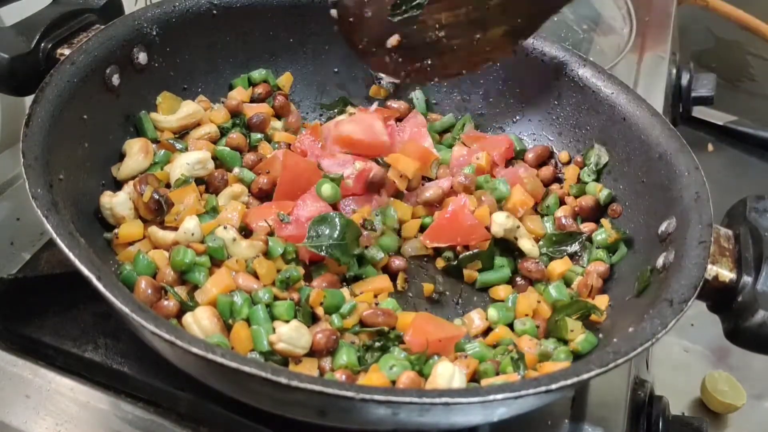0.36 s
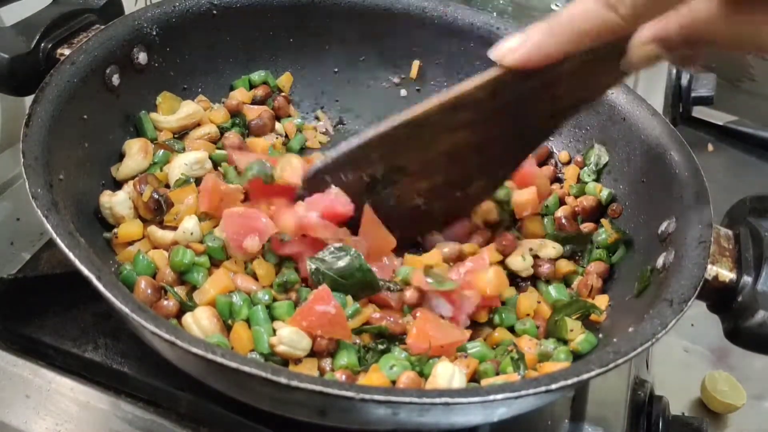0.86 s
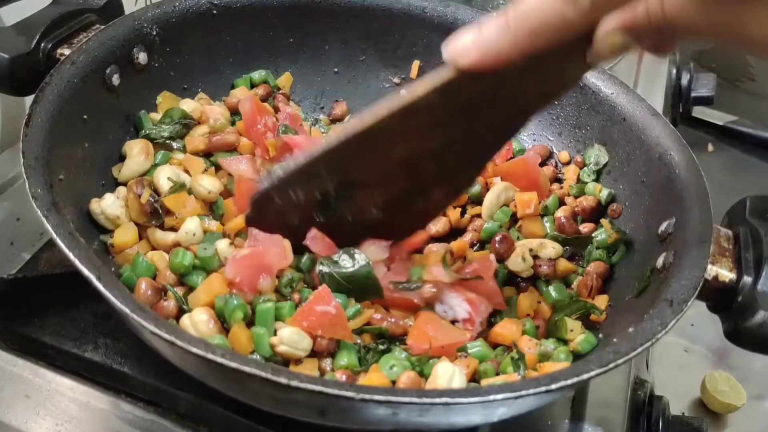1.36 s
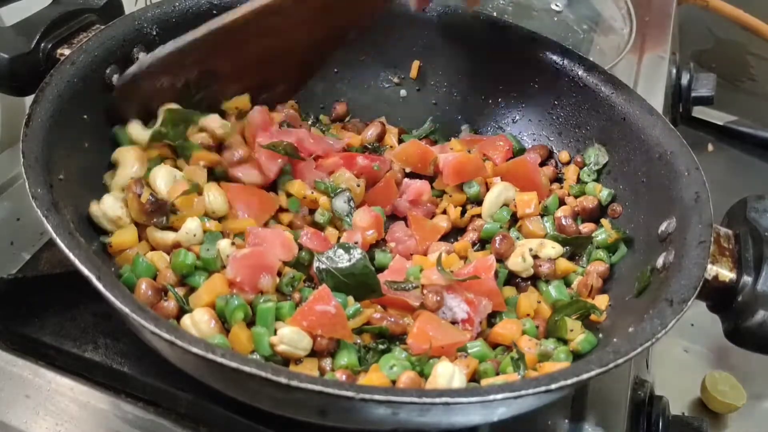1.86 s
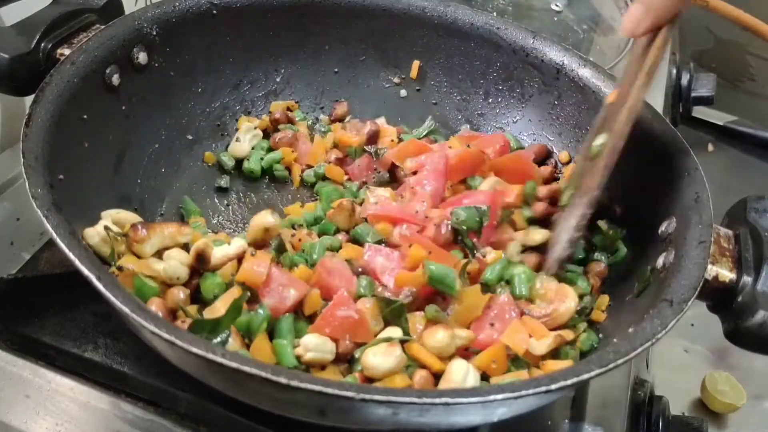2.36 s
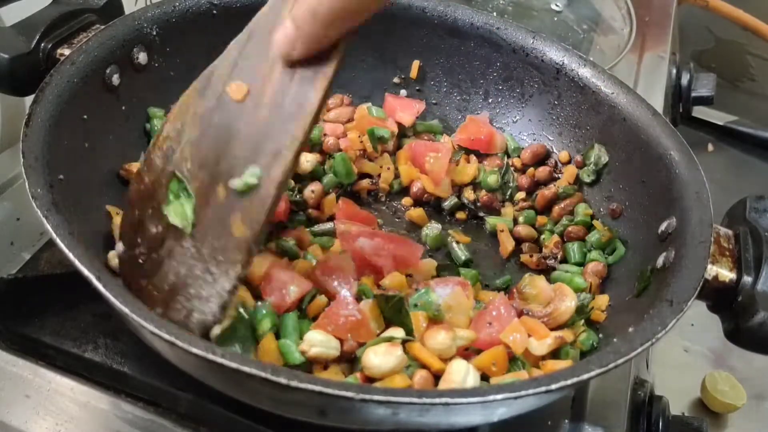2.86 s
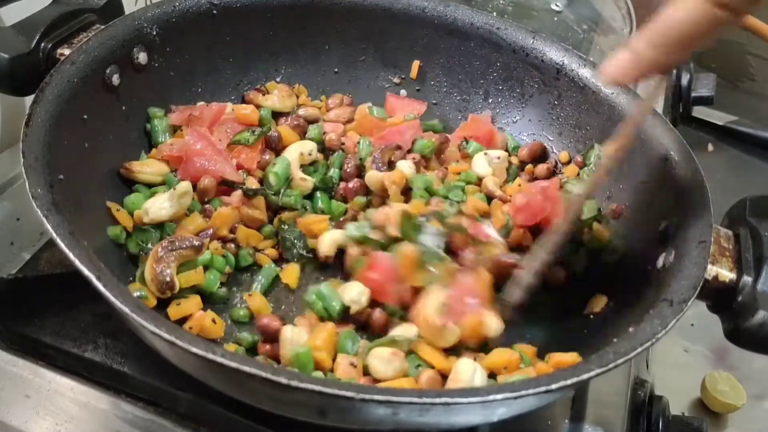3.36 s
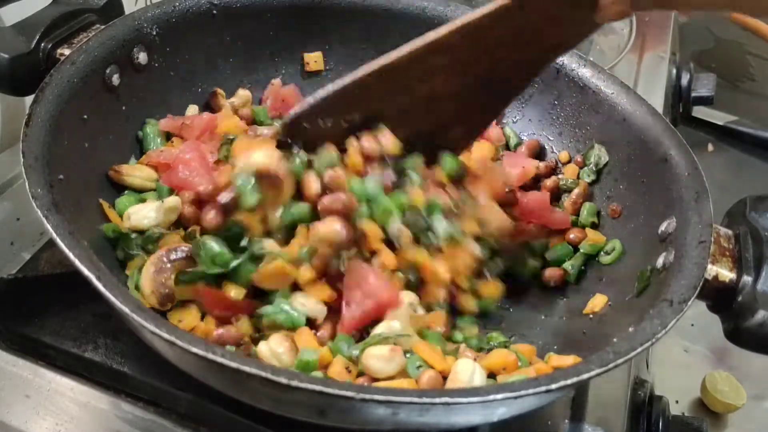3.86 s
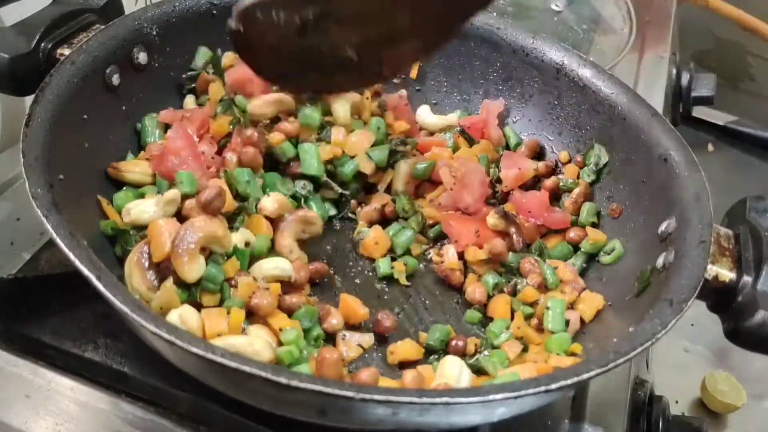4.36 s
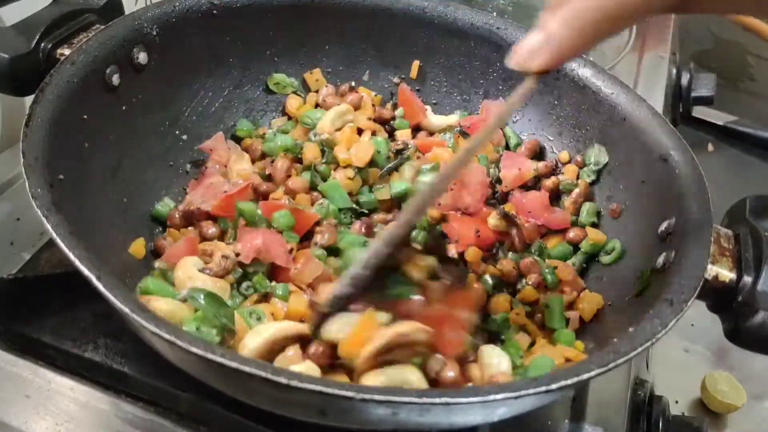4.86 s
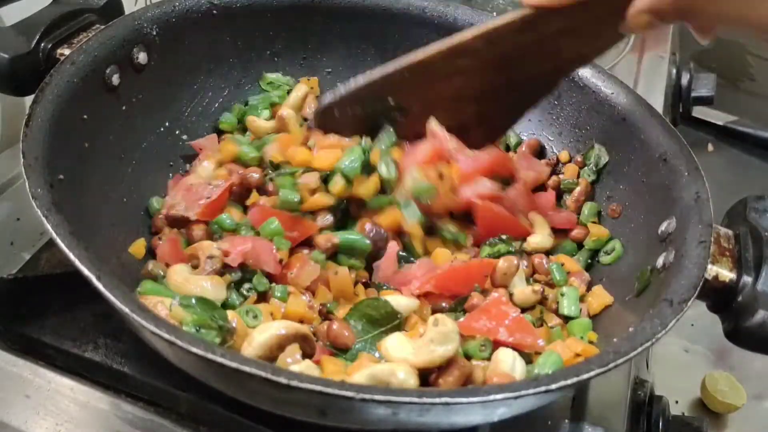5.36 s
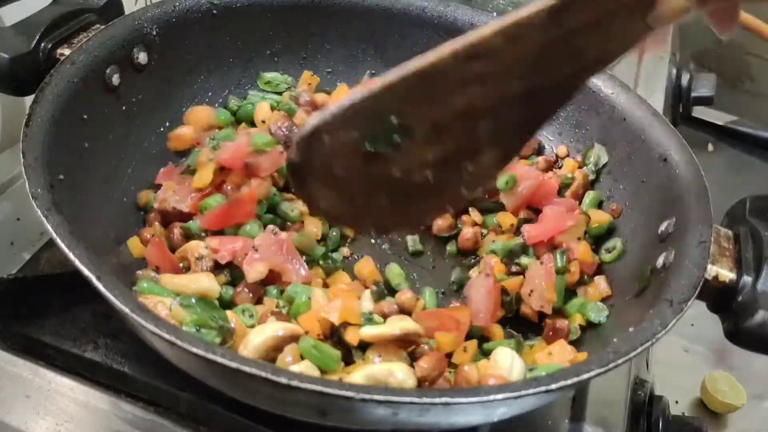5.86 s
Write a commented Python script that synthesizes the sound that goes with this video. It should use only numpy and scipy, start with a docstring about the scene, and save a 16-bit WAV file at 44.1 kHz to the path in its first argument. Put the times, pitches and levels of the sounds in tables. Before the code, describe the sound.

A wooden spatula knocks and scrapes through chopped vegetables and nuts in a coated pan, over a light sizzle with spitting drops and low flame rumble.

```python
"""A small tiled kitchen, with two microphone ports of unlike colour close to a coated pan on a gas flame.
The flame rumbles and a deep throb swells; oil and juice sizzle, flare and spit as shaped noise.
A wooden spatula scrapes chopped vegetables and nuts: dense small blows ring the modes of the pan.
Its knocks start all modes at once and are choked; sparse taps give the answer of the kitchen."""
import sys
import numpy as np
from scipy import signal
from scipy.fft import rfft, irfft
from scipy.io import wavfile
from scipy.ndimage import uniform_filter1d

SR = 44100
rng = np.random.default_rng(int(sys.argv[2]) if len(sys.argv) > 2 else 0)


def gain_from_db(level_db):
    """Turn a decibel level (scalar or array-like) into a linear amplitude factor."""
    decades = np.asarray(level_db, float) / 20
    return 10 ** decades


def generate_wav(sig):
    """Save sig (samples, or channels by samples) to the path in sys.argv[1] as 16-bit PCM at SR."""
    pcm = np.round(np.clip(np.atleast_2d(sig).T, -1, 1) * 32767).astype(np.int16)
    wavfile.write(sys.argv[1], SR, pcm)


N = 264114
TIME = np.arange(N) / SR  # s
HZ = np.fft.rfftfreq(N, 1 / SR)

# burner and quiet of the room: (frequency [Hz], relative level [dB])
FLAME = [(35, -46), (60, 12), (119, 8), (193, 9), (299, 20.5), (542, 6), (879, 1), (1090, 7.5), (2500, 1),
         (3250, -63)]
# swells of a deep throb of pan and stove: (middle [s], half length [s], level [dB])
THROBS = [(0.335, 0.17, -59.5), (1.345, 0.29, -54.5), (2.287, 0.23, -58), (2.79, 0.28, -66.5),
          (3.826, 0.1, -52), (4.468, 0.096, -51.5), (5.907, 0.052, -50)]
# heat of the frying: (time [s], fizz level [dB])
SIZZLE = [(0.0, -53), (0.4, -54.5), (0.92, -55.5), (1.06, -48.5), (1.17, -54.5), (1.5, -51.5), (1.75, -48),
          (1.95, -59), (2.25, -57), (2.37, -52), (2.85, -49), (4.45, -51.5), (4.86, -64), (5.05, -55.5),
          (5.42, -57), (5.65, -51.5), (5.79, -59), (5.99, -52)]
# colour of the fine bubbles: (frequency [Hz], relative level [dB])
FIZZ = [(3500, -23), (5500, 2), (6500, 4), (8000, 2.5), (10000, 7), (11800, -4), (14500, 2), (16000, 4.5)]
# colour of the coarser bubbles: (frequency [Hz], relative level [dB])
BUBBLING = [(900, -15), (1900, -13), (2500, -4), (3500, -2.5), (5000, -4.5), (7000, -14.5)]
# fresh juice reaching the oil: (start [s], held [s], level [dB], centre [Hz], width [octaves])
FLARES = [(0.336, 0.088, -48, 3860, 1.6), (0.71, 0.046, -47.5, 4080, 1.5), (0.999, 0.16, -56, 3570, 0.49),
          (2.07, .26, -60.5, 5140, 0.078), (4.93, 0.11, -58.5, 5150, 0.11), (5.55, 0.11, -58, 3500, 0.54)]
# drops of juice bursting in the oil: (time [s], level at the crack [dB], centre [Hz])
SPITS = [(1.295, -41, 15100), (1.413, -38.5, 8000), (2.199, -40, 14700), (2.353, -34.5, 10900),
         (2.771, -34, 10000), (2.9533, -38, 13600), (2.9674, -35, 9650), (3.305, -35.5, 8700),
         (3.33, -38, 9500), (3.334, -40, 7000), (3.418, -48, 9500), (3.468, -50, 9000), (3.496, -34, 5750),
         (3.772, -32.5, 9500), (4.0368, -34.5, 9750), (4.322, -38.5, 5770), (4.93, -36, 14800),
         (5.0387, -34.5, 9500), (5.1265, -33.5, 5760), (5.516, -41.5, 9000)]
# decay of the tiled room: (frequency [Hz], t60 [s])
KITCHEN = [(200, 0.57), (800, 0.21), (2500, 0.47), (8000, 0.049)]
# pan modes in four groups, low, middle, high, top, before damping:
# (frequency [Hz], relative level [dB], t60 [s])
PAN_MODES = [
    [(181, 4.5, 0.15), (239.4, 11.5, 0.24), (312.6, 18, 0.16), (365, 4.5, 0.21), (420, 18.5, 0.14),
     (511, 14.5, 0.1)],
    [(593, 5, 0.1), (661.5, 8, 0.16), (747, 9.5, 0.086), (800.5, 8.5, 0.18), (862.6, 10, 0.088),
     (980, 9.5, 0.064)],
    [(1180, 0, 0.12), (1260, -0.5, 0.32), (1399, 15.5, 0.028), (1465, 1.5, 0.19), (1547, 7, 0.088),
     (1946, 2, 0.11), (2290, 4, 0.082), (2570, -7, 0.22)],
    [(2502, 33.5, 0.011), (3240, 17.5, 0.041), (4154, 22, 0.039)],
]
# strokes of the spatula through the food; edge = how much the bare edge touches the pan:
# (start [s], held [s], pressure [dB], edge [dB], ring of the touched spot [Hz])
STROKES = [(0.046, 0.14, -59.5, 2, 313), (0.186, 0.034, -59.5, 5.5, 850), (0.257, 0.11, -38.5, -5.5, 634),
           (0.334, 0.019, -71, -3.5, 237), (0.716, 0.011, -47, 2.5, 812), (0.949, 0.048, -67.5, 5.5, 853),
           (1.047, 0.32, -56, -39, 311), (1.237, 0.057, -46.5, -3, 247), (1.31, 0.012, -50.5, 0, 870),
           (1.586, 0.04, -44, -1.5, 307.7), (1.661, 0.11, -47, 1.5, 930), (2.179, 0.072, -53.5, -3, 420),
           (2.267, 0.043, -38, -1.5, 957), (2.668, 0.039, -40, -0.5, 1260), (2.76, 0.14, -64, 0, 241),
           (3.138, 0.028, -39, -5.5, 1260), (3.489, 0.15, -52, 1, 718), (3.718, 0.027, -62, 0.5, 866),
           (3.822, 0.047, -46.5, 1.5, 1260), (3.938, 0.034, -46, -6.5, 362), (4.05, 0.05, -62.5, 6, 856),
           (4.236, 0.18, -67, 10.5, 880), (4.322, 0.13, -40.5, -2, 779), (4.817, 0.031, -44, 7.5, 1570),
           (5.045, 0.016, -50.5, 6, 1920), (5.075, 0.038, -39.5, -2.5, 653), (5.414, 0.01, -64, 1.5, 865),
           (5.58, 0.17, -67, 12, 869), (5.819, 0.18, -45, -3, 239), (5.944, 0.058, -52, 12, 1480)]
# spatula landing on the pan: (time [s], peak of middle ring [dB], centre of middle ring [Hz],
# centre of high ring [Hz], top ring re middle peak [dB])
KNOCKS = [(0.186, -46.5, 800, 1340, 1.5), (0.26, -23, 765, 1180, -19.5), (0.279, -27, 640, 1550, -61),
          (0.337, -37, 586, 1390, -3), (0.67, -51, 980, 1180, -2), (0.715, -33.5, 895, 1370, -27),
          (0.856, -49.5, 840, 1260, -75), (1.273, -37.5, 820, 1300, -49), (1.33, -33.5, 880, 1260, -63),
          (1.588, -48, 800, 1230, -19), (1.642, -38.5, 800, 1260, -37), (2.178, -51.5, 650, 2290, 8.5),
          (2.269, -25, 870, 1510, -15), (2.668, -34.5, 920, 1260, -3), (2.896, -42, 820, 930, -27),
          (3.009, -40, 875, 1630, 7.5), (3.0182, -52, 875, 1660, -2), (3.136, -38, 664, 1230, -29),
          (3.493, -51.5, 740, 1260, 6), (3.825, -37, 870, 1360, -8), (3.94, -43.5, 596, 1950, 2.5),
          (4.235, -47.5, 885, 1580, -9), (4.321, -37.5, 926, 1260, -1.5), (4.8178, -17, 860, 1520, -17),
          (5.048, -44, 750, 1470, -20), (5.075, -33, 905, 1360, -43), (5.82, -45.5, 613, 1900, -1.5),
          (5.9434, -14.5, 874, 1600, -5.5), (5.953, -29, 980, 1400, -21)]
# how alike the two ports hear, limited to 0-1: (frequency [Hz], likeness [0-1])
LIKENESS = [(60, 0.4), (140, 1.3), (400, 0.58), (800, 0.74), (1150, 0.4), (4300, 0.2), (5400, 0.5),
            (6500, 1), (7300, 0.6), (9400, 1.04), (11300, 0)]
# unlike colour of the two ports: (frequency [Hz], left minus right [dB])
LEAN = [(100, -2), (500, -1.5), (2000, -3), (4500, -4.5), (6200, -8.5), (7000, -6.5), (8100, 9),
        (9200, -6.5), (10300, -8.5), (12000, -18.5), (15500, -19)]
# response common to both ports: (frequency [Hz], level [dB])
MIC = [(30, -13), (70, -12.5), (110, -3.5), (15500, 0), (15800, -30)]

FLAME_DB, RESTING_DB = -64.5, -68.5  # rms of the rumble; the throb between its swells
BUBBLING_DB, BUBBLING_DB_PER_S = -8.5, 1.9936  # re fizz; it grows as the juice spreads
FLARE_RISE_S, FLARE_FADE_DB_PER_S = 0.02, 206
BITE_S, RASP_BITE_S = 0.0016, 0.012  # time to full pressure; the rasp comes up more slowly
# one value each for shudder (low modes), middle ring and rasp (high modes)
SETTLE_DB_PER_S = (166, 150, 240)  # after a stroke the pieces settle
RUB_DAMPING = (2.14, 1.9, 3)  # the food on the pan shortens the ring by this factor
BLOWS_PER_S = (700, 450, 450)  # the pieces shudder more densely than the edge ticks
RASP_DB, RASP_PER_EDGE = -3.5, 1  # rasp re shudder for edge 0, and how it follows the edge
SPOT_DB, SPOT_OCTAVES = 11.5, 0.062  # modes near the ring of the touched spot stand out
TOP_HZ, TOP_OCTAVES_PER_DB = 3050, 0.022  # the sharper the knock, the higher its top ring
# the wood stays down and chokes the ring, more after a harder blow
CHOKE_S, CHOKE_FROM_DB, CHOKE_PER_DB = 0.0062, -47.5, 0.5
THUD_DB = 3  # low part of a knock re the stroke pressure at that moment
HIGH_DB, HIGH_PER_PEAK, HIGH_PER_TOP = -5.5, -0.21, 0.25  # high ring stands out in light and sharp knocks
LEFT_LAG_S = 0.00015


def evened(x):
    """Scales to rms 1."""
    return x / np.sqrt(np.mean(x ** 2) + 1e-20)


def read(points, hz):
    """Reads a table on a log-frequency axis."""
    f, value = np.transpose(points)
    return np.interp(np.log(hz + 1), np.log(f + 1), value)


def coloured(x, points):
    """Shapes the spectrum of x by a table of frequencies and levels."""
    return irfft(rfft(x) * gain_from_db(read(points, HZ)), N)


def patchy(x, patchy_db, bins, frames):
    """Uneven level over pitch and time: random patches rise slightly or drop out."""
    z = signal.stft(x, nperseg=512)[2]
    field = rng.standard_normal(z.shape[:0:-1]).T
    field = uniform_filter1d(field, size=bins, axis=0)
    field = evened(uniform_filter1d(field, size=frames, axis=1))
    return signal.istft(z * gain_from_db(patchy_db * np.minimum(field, 1.2)), nperseg=512)[1][:, :N]


def clicks(per_s, spread_db):
    """Two random click trains of either sign, of uneven size."""
    size = gain_from_db(spread_db * np.minimum(rng.exponential(1, (2, N)), 5))
    return size * (rng.random((2, N)) < per_s / SR) * rng.choice([-1., 1.], (2, N))


def bursts(per_s, spread_db, t60, count=6):
    """Bubbles of several shapes, each a short dying scrap of noise; rms 1 in all."""
    shapes = rng.standard_normal((count, 2, 900)) * gain_from_db(-60 * np.arange(900) / SR / t60)
    trains = (signal.oaconvolve(clicks(per_s / count, spread_db), s, axes=1)[:, :N] for s in shapes)
    return evened(sum(trains))


def flame():
    """Rumble of the burner and the quiet of the room, over a deep throb that swells now and then."""
    rumble = patchy(coloured(rng.standard_normal((2, N)), FLAME), patchy_db=3.5, bins=2, frames=12)
    throb_colour = [(70, -31), (100, -13.0), (128, -9.0), (155, -11.0), (220, -37.0)]  # (Hz, dB)
    throb = coloured(rng.standard_normal((2, N)), throb_colour)
    swells = sum(gain_from_db(db) * np.exp(-((TIME - s) / half) ** 2) for s, half, db in THROBS)
    return gain_from_db(FLAME_DB) * evened(rumble) + (gain_from_db(RESTING_DB) + swells) * evened(throb)


def kitchen(x):
    """The room's answer: sparse taps of random sign, one in every 20 samples, each band dying at its own speed."""
    taps = np.zeros((2, SR))
    at = np.arange(400, SR - 20, 20) + rng.integers(0, 20, (2, (SR - 401) // 20))
    np.put_along_axis(taps, at, rng.choice([-1., 1.], at.shape), 1)
    hz, t, z = signal.stft(taps, SR, nperseg=256)
    tail = signal.istft(z * gain_from_db(-60 * t / read(KITCHEN, hz)[:, None]), SR, nperseg=256)[1]
    return signal.fftconvolve(x, tail / np.linalg.norm(tail[0]), axes=1)[:, :N]


def sizzle():
    """Tiny steam bubbles burst in clumps over the hiss of those too small to tell apart."""
    fizz_db = np.interp(TIME, *np.transpose(SIZZLE))
    bubbling_db = BUBBLING_DB + BUBBLING_DB_PER_S * TIME
    clumps = gain_from_db(1.27 * evened(uniform_filter1d(rng.standard_normal(N), size=900)))
    hiss = rng.standard_normal((4, N))
    fine = 0.32 * bursts(per_s=1600, spread_db=2.5, t60=0.0057) + hiss[:2]
    coarse = 0.7 * bursts(per_s=1100, spread_db=-1.5, t60=0.026) + hiss[2:]
    fizz = evened(coloured(fine, FIZZ)) * gain_from_db(fizz_db)
    bubbling = evened(coloured(coarse, BUBBLING)) * gain_from_db(fizz_db + bubbling_db)
    bed = patchy(fizz + bubbling, patchy_db=5, bins=2, frames=13)
    # larger bubbles stand out singly
    crackle = coloured(bursts(per_s=450, spread_db=4.2, t60=0.004), FIZZ)
    return clumps * bed + evened(crackle) * gain_from_db(fizz_db - 7)


def flares():
    """Fresh juice meets the oil: sudden denser bubbling around a pitch of its own."""
    bubbles = rfft(bursts(per_s=1800, spread_db=0.0, t60=0.01))
    out = np.zeros((2, N))
    for start, held, db, centre_hz, octaves in FLARES:
        bell = np.exp(-(np.log2((HZ + 1) / centre_hz) / octaves) ** 2)
        rise = np.clip((TIME - start) / FLARE_RISE_S, 0, 1)
        fade_db = FLARE_FADE_DB_PER_S * np.maximum(TIME - start - held, 0)
        out += evened(irfft(bubbles * bell, N)) * rise * gain_from_db(db - fade_db)
    return out


def spits():
    """A drop bursts: a sharp wide crack around its centre, then a short puff of steam."""
    length = 2000
    out, t = np.zeros((2, N + length)), np.arange(length) / SR
    hz = np.fft.rfftfreq(length, 1 / SR)
    envelope = gain_from_db(-60 * t / 0.0059) + 0.13 * gain_from_db(-60 * t / 0.22)  # crack + puff
    for s, db, centre_hz in SPITS:
        slope_db = -9 * abs(np.log2((hz + 1) / centre_hz))
        noise = irfft(rfft(rng.standard_normal((2, length))) * gain_from_db(slope_db), length)
        start = round(s * SR)
        out[:, start:start + length] += gain_from_db(db) * evened(noise) * envelope
    return out[:, :N] * gain_from_db([[1], [-4]])  # mostly on the first path


def ring(modes, damping, give, turn, centre_hz=None, favour_db=0):
    """Answer of a group of modes to one blow; give = cycles of soft contact, turn = factor of every other mode."""
    t = np.arange(SR // 4) / SR
    hz, db, t60 = np.transpose(modes)[:, :, None]
    if centre_hz:  # the landing spot favours nearby modes, by favour_db per octave
        db = db - favour_db * np.minimum(abs(np.log2(hz / centre_hz)), 0.4)
    waves = gain_from_db(db - 60 * t * damping / t60) * np.sin(2 * np.pi * hz * t)
    onset = (1 - np.exp(-t * hz.mean() / give)) ** 2
    return onset * (waves[::2].sum(0) + turn * waves[1::2].sum(0))


def pressing(row, settle_db_per_s, offset_db, per_edge, bite_s, t):
    """Strength of one stroke at the times t: quick bite, hold, steady settling."""
    start, held, pressure_db, edge_db = row[:4]
    settled_db = settle_db_per_s * np.maximum(t - start - held, 0)
    db = pressure_db + offset_db + per_edge * edge_db - settled_db
    return np.clip((t - start) / bite_s, 0, 1) * gain_from_db(db)


def touch():
    """Pressure in dB of all strokes together, summed as power."""
    power = sum(pressing(row, SETTLE_DB_PER_S[0], 0, 0, BITE_S, TIME) ** 2 for row in STROKES)
    return 10 * np.log10(1e-12 + power)


def touched_spot(modes, spot_hz):
    """Raises the modes close to the ring of the touched spot."""
    hz, db, t60 = np.transpose(modes)
    nearness = np.maximum(1 - abs(np.log2(hz / spot_hz)) / SPOT_OCTAVES, 0)
    return np.transpose([hz, db + SPOT_DB * nearness, t60])


def strokes():
    """The edge sticks and slips and the pieces tumble: dense small blows on the pan."""
    out = np.zeros((2, N + SR))
    offsets_db, per_edges = (0, 0, RASP_DB), (0, 1, RASP_PER_EDGE)
    bites_s = (BITE_S, BITE_S, RASP_BITE_S)
    # the three lower groups only
    groups = zip(PAN_MODES, RUB_DAMPING, BLOWS_PER_S, SETTLE_DB_PER_S, offsets_db, per_edges, bites_s)
    for modes, damping, per_s, *law in groups:
        blows = clicks(per_s, spread_db=2.5)
        ring_energy = np.sum(ring(modes, damping, give=0.65, turn=-1.46) ** 2)
        size = np.sqrt(np.mean(blows ** 2) * ring_energy)
        for row in STROKES:
            a = round(row[0] * SR)
            b = a + SR // 2
            pushed = blows[:, a:b] * pressing(row, *law, TIME[a:b]) / size
            answer = ring(touched_spot(modes, row[4]), damping, give=0.76, turn=-0.83)
            rub = signal.fftconvolve(pushed, answer[None], axes=1)
            out[:, a:a + rub.shape[1]] += rub
    return patchy(out[:, :N], patchy_db=2.2, bins=2, frames=40)


def knocks():
    """All modes start together: a short strong burst, choked by the wood and the food on the pan."""
    out, pressure_db = np.zeros(N + SR), touch()
    low_modes, middle_modes, high_modes, top_modes = PAN_MODES
    low = ring(low_modes, damping=6.9, give=1.0, turn=0.85)
    t = np.arange(len(low)) / SR
    for s, db, middle_hz, high_hz, top_db in KNOCKS:
        top_hz = TOP_HZ * 2 ** (TOP_OCTAVES_PER_DB * top_db)
        middle = ring(middle_modes, damping=2.8, give=2.1, turn=0.4, centre_hz=middle_hz, favour_db=70)
        high = ring(high_modes, damping=1.62, give=2.1, turn=0.85, centre_hz=high_hz, favour_db=45.5)
        top = ring(top_modes, damping=1.2, give=2.0, turn=1.0, centre_hz=top_hz, favour_db=45)
        left = gain_from_db(-CHOKE_PER_DB * max(db - CHOKE_FROM_DB, 0))  # what the choke leaves of the ring
        choke = left + (1 - left) * np.exp(-(t / CHOKE_S) ** 4)
        low_db = pressure_db[round((s + BITE_S) * SR)] + THUD_DB
        high_db = db + HIGH_DB + HIGH_PER_PEAK * db + HIGH_PER_TOP * top_db
        parts = (low, middle * choke, high * choke, top * choke)
        peaks_db = (low_db, db, high_db, db + top_db)
        knock = sum(gain_from_db(peak_db) * p / abs(p).max() for p, peak_db in zip(parts, peaks_db))
        start = round(s * SR)
        out[start:start + len(knock)] += knock
    return out[:N]


def scene():
    """Two unrelated paths from the pan; the direct knock takes mostly the first."""
    hits, rubbing = knocks(), strokes()
    direct = hits * gain_from_db([[3], [-4]])
    answer = gain_from_db(-7) * kitchen(hits[None]) + gain_from_db(-15.5) * kitchen(rubbing)
    return flame() + sizzle() + flares() + spits() + answer + rubbing + direct


def band_limit(x):
    """A steep low-pass at the top of the band."""
    return signal.sosfilt(signal.butter(12, 16600, fs=SR, output="sos"), x)


def record(dry):
    """The ports share the first path and split the second; the left one is farther and has its own colour."""
    like, lean = np.clip(read(LIKENESS, HZ), 0, 1), gain_from_db(read(LEAN, HZ))
    shared, split = rfft(dry) * np.sqrt([(1 + like) / 2, (1 - like) / 2])
    lag_s = LEFT_LAG_S / (1 + (HZ / 3000) ** 6)  # only below the treble
    left = (shared + split) * lean * np.exp(-2j * np.pi * HZ * lag_s)
    right = shared - split
    ports = np.array([left, right]) * 2 / (1 + lean)
    mix = irfft(ports * gain_from_db(read(MIC, HZ)), N)
    return band_limit(mix)


dry = scene()
out = record(dry)
generate_wav(out)
```